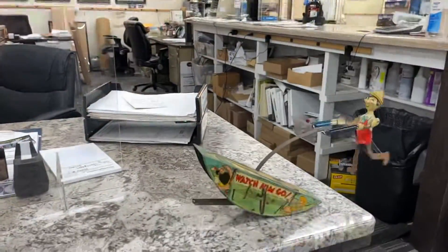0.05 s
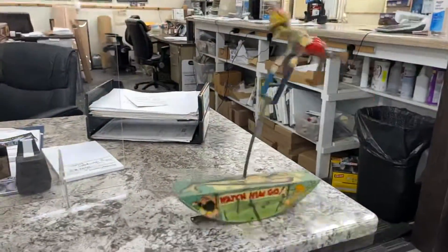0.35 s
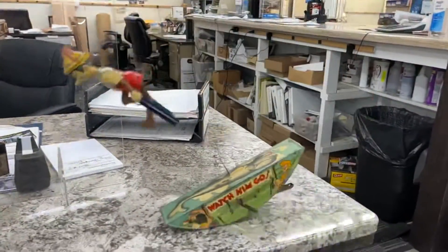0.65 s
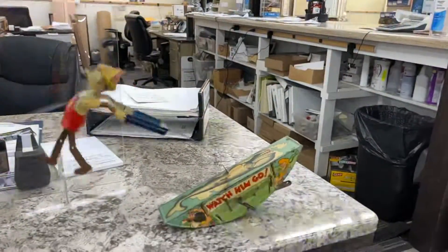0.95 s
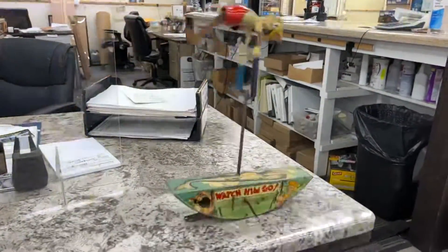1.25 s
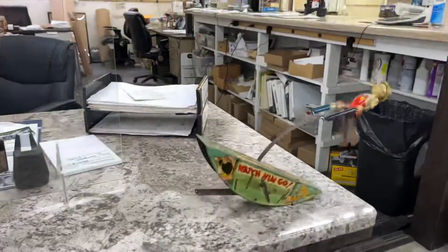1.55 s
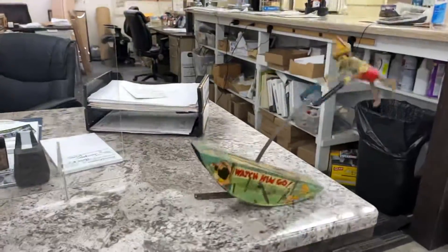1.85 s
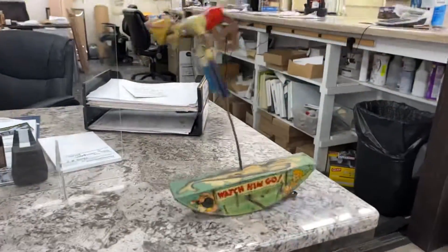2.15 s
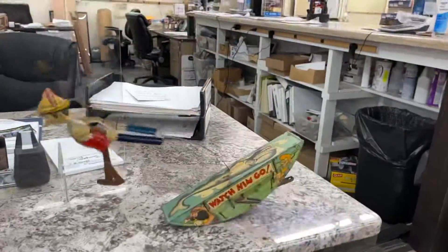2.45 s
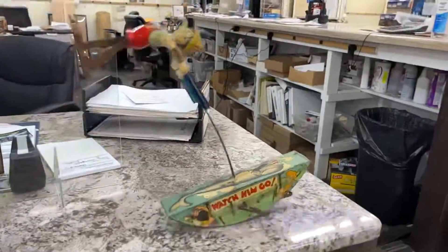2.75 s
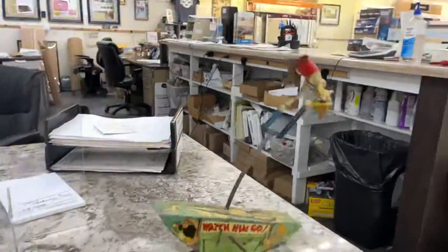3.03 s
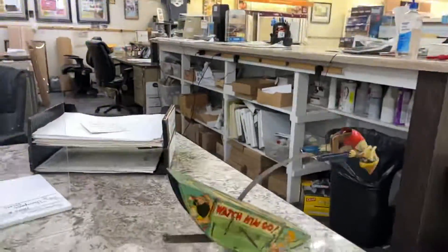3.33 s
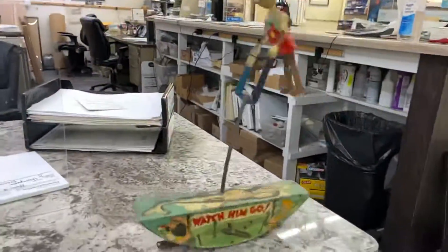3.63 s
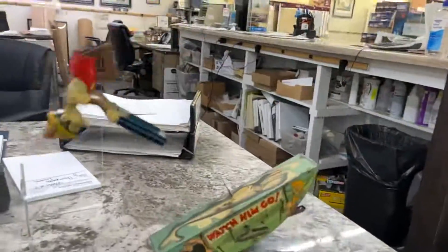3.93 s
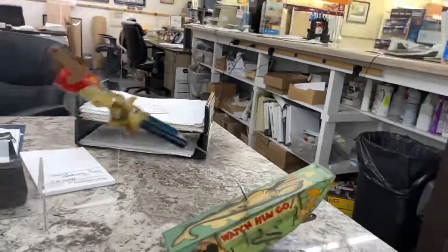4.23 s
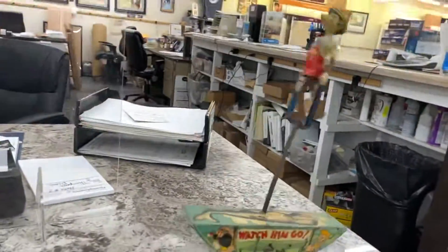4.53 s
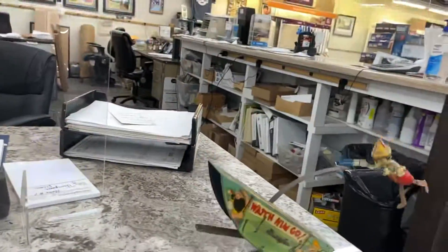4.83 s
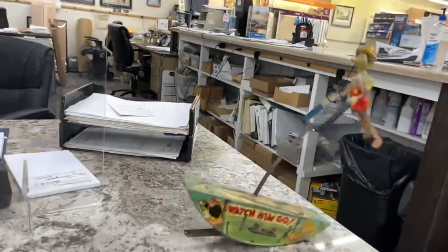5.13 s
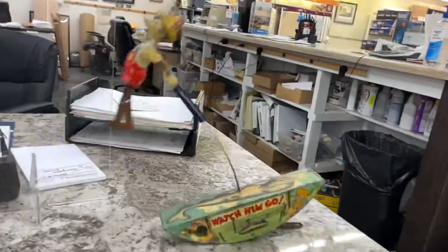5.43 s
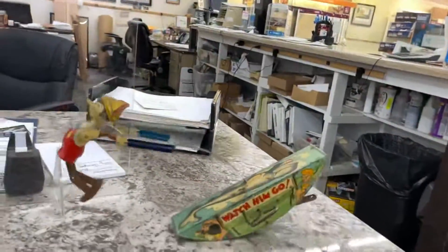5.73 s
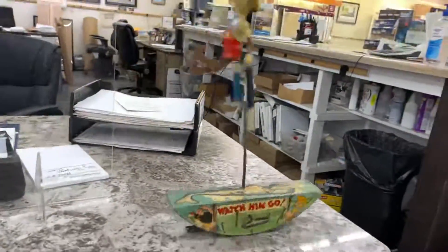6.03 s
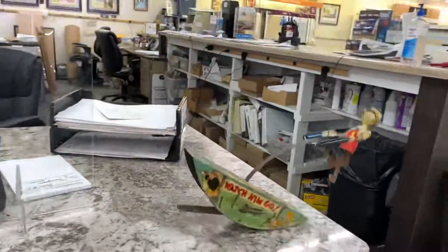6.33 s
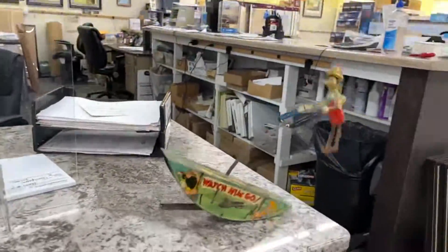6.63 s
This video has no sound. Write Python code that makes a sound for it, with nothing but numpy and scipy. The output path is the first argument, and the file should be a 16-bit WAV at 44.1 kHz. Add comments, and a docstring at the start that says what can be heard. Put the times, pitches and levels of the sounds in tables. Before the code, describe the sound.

A tin wind-up toy rocks back and forth on a stone counter in a quiet office. At the end of each swing its loose parts clatter, a steel rod snaps against its stop and the thin shell rings briefly, eight times at an even pace. Between the clacks come small ticks, a few tiny squeaks and faint gritty rolling. The toy is slightly to the left in stereo, with low ventilation rumble underneath.

```python
"""Tin wind-up toy on a stone counter

A quiet office, a stereo pair, the toy nearer the left microphone and still rattling faintly at the start.
A figure on a rod swings over a boat-shaped hull. At each end of the swing the loose tin parts clatter,
the rod snaps against its stop and rebounds, and the hull rings. In between the hull rolls on the stone
and the joints tick and squeak. Ventilation rumbles underneath."""
import sys
import numpy as np
from scipy import signal
from scipy.fft import rfft, irfft
from scipy.io import wavfile
from scipy.ndimage import uniform_filter1d

SR = 44100
rng = np.random.default_rng(int(sys.argv[2]) if len(sys.argv) > 2 else 0)


def bounce(signal):
    """Save signal as a 16-bit WAV file at the path given by the first command-line argument."""
    frames = np.transpose(np.atleast_2d(signal))
    limited = np.clip(frames, -1, 1)
    pcm = np.round(limited * 32767).astype(np.int16)
    wavfile.write(sys.argv[1], SR, pcm)


N = 298998
BLOW_SAMPLES, LEAD_IN_S = 4096, .008

# the toy lands, left end first, then each end in turn: start_s, level_db, bass_db, relative_ring_db
LANDINGS = [(0.670, -17.7, -3, -25), (1.4755, -15.7, -1.5, -22.5), (2.319, -15.7, 0, -25),
            (3.120, -15.5, 2, -26), (3.9375, -14.8, 0, -26), (4.7355, -15.2, 3, -26.5),
            (5.533, -17.5, 0.5, -25), (6.284, -15.3, 2, -26)]
# the hull sets off rolling: start_s, level_db, brightness_db, lull_db
ROLLS = [(0.29, -46, -8, -14), (1.12, -47.5, -6, -6), (1.94, -45.5, -6, -14), (2.79, -46.5, -6, -7),
         (3.565, -44.5, 1, -8), (4.42, -44, 2, -3), (5.08, -45.5, 0, -7), (5.97, -48, -3, 0),
         (6.65, -43.5, 0, -4)]
# spectrum of a light knock in the toy: frequency_hz, gain_db
TICK_COLOUR = [(200, -12.5), (600, -1), (1000, 9), (1500, 2), (2350, 7.5), (3100, -1.5), (4100, 0),
               (6400, -4.5), (8200, -15.5), (9800, -4.5), (13000, -10), (15500, -21.5)]


def undb(db):
    """Decibels to gain."""
    return 10 ** (np.asarray(db) / 20)


def at(table, hz):
    """Read a curve of frequency_hz, value points on a log-frequency axis."""
    points, values = np.transpose(table)
    return np.interp(np.log(hz + 1), np.log(points), values)


def bins(size):
    """Frequencies in the spectrum of size samples."""
    return np.arange(size // 2 + 1) * SR / size


def unit(x):
    """Scale to rms 1."""
    return x / np.sqrt(np.mean(x ** 2))


def tint(x, db):
    """Minimum-phase filter with a gain in dB for each bin."""
    size = x.shape[-1]
    cepstrum = irfft(np.log(undb(db)), size)
    cepstrum[1:size // 2] *= 2
    cepstrum[size // 2 + 1:] = 0
    return irfft(rfft(x) * np.exp(rfft(cepstrum)), size)


def add(track, start_s, x):
    """Mix x into the track."""
    i = max(int(start_s * SR), 0)
    track[..., i:i + x.shape[-1]] += x[..., :N - i]


def fade(t, t60):
    """Exponential decay by 60 dB in t60 seconds."""
    return np.exp(-np.log(1000) * t / t60)


def wavy(size, span):
    """Smooth random values of rms 1 that change over span points."""
    return unit(uniform_filter1d(uniform_filter1d(rng.standard_normal(size), span), span))


def grit(size, spread_db, width):
    """Dense tiny contacts of uneven strength; width is the part that differs between left and right."""
    strength = undb(spread_db * np.repeat(rng.standard_normal(size // 16 + 1), 16)[:size])
    return unit(strength * (rng.standard_normal(size) + width * rng.standard_normal((2, size))))


def blow(db, length_s, colour_db, rise_s, buzz_db, buzz_t60, width, ripple_db, ragged_db):
    """A run of contacts between metal parts: they graze, bite after LEAD_IN_S and leave a ragged buzz."""
    t = np.arange(BLOW_SAMPLES) / SR - LEAD_IN_S
    after = np.maximum(t, 0)
    bite = .5 + .5 * np.tanh(t / rise_s - .5)
    buzz = undb(buzz_db + ragged_db * wavy(BLOW_SAMPLES, span=150)) * fade(after, buzz_t60)
    force = bite * (np.exp(-(after / length_s) ** 2) + buzz)
    resonances_db = ripple_db * wavy(len(colour_db), span=22)  # each point of contact has its own
    hit = tint(force * grit(BLOW_SAMPLES, spread_db=2.5, width=width), colour_db + resonances_db)
    peak_power = uniform_filter1d(np.mean(hit ** 2, axis=0), size=128).max()
    return undb(db) * hit / np.sqrt(peak_power)


def blows(hits, colour, **contact):
    """Parts knock together, dull or bright. Hits: start_s, level_db, bass_db, treble_db, length_s."""
    out, hz = np.zeros((2, N)), bins(BLOW_SAMPLES)
    for start_s, db, bass_db, treble_db, length_s in hits:
        shade_db = at([(1200, bass_db), (4000, 0), (9000, treble_db)], hz)
        add(out, start_s - LEAD_IN_S, blow(db, length_s, at(colour, hz) + shade_db, **contact))
    return out


def ventilation(drone_hz=73, drone_width_hz=12, drone_db=4, air_db=-43):
    """Low duct rumble, nearly alike at both microphones, with faint steady air noise above."""
    # spectrum of the duct noise: frequency_hz, gain_db
    duct_colour = [(15, -24), (45, -8), (75, 2.5), (110, -6.5), (170, -18), (300, -27.5), (600, -33),
                   (1100, -32), (3000, -43), (6000, -54), (9000, -60.5), (15000, -72)]
    # the rumble swells and ebbs: time_s, level_db
    swells = [(0.0, -41.5), (2.08, -46.5), (2.26, -43.5), (5.93, -42.5), (6.78, -38.5)]
    hz = bins(N)
    colour_db = at(duct_colour, hz) + drone_db * np.exp(-((hz - drone_hz) / drone_width_hz) ** 2)
    mid, side = tint(rng.standard_normal((2, N)), colour_db)
    side = tint(side, at([(70, -16), (250, -10), (700, -2.5)], hz))
    air = unit(np.array([mid + side, mid - side]))
    rumble = irfft(rfft(air) * (hz < 160), N)
    swell_db = np.interp(np.arange(N) / SR, *np.transpose(swells))
    return rumble * undb(swell_db) + (air - rumble) * undb(air_db)


def office(x, early_db=-11, early_t60=.27, late_db=-11):
    """Quick reflections from the counter and shelves, then a diffuse tail."""
    # decay of the tail: frequency_hz, t60_s
    decay = [(250, 0.22), (900, 0.45), (2200, 0.48), (5000, 0.73), (9000, 0.55), (14000, 0.49)]
    # spectrum of the reflected sound: frequency_hz, gain_db
    room_colour = [(200, -2.5), (450, 0), (900, -1.5), (2000, 3), (4500, 0), (7000, -0.5), (9000, -7),
                   (12500, -1.5), (15000, -30)]
    t, hz = np.arange(SR) / SR, bins(SR)
    noise = rfft(rng.standard_normal((2, SR)))
    band = np.round(2 * np.log2(np.maximum(hz, 200))) / 2  # half octaves
    late = sum(irfft(noise * (band == k), SR) * fade(t, at(decay, 2 ** k)) for k in np.unique(band))
    late = unit(late * (1 - np.exp(-t / .0088)))
    early = unit(rng.standard_normal((2, SR)) * fade(t, early_t60) * (t > .002))
    response = tint(undb(early_db) * early + undb(late_db) * late, at(room_colour, hz)) / np.sqrt(SR)
    return signal.fftconvolve(x, response, axes=1)[:, :N]


def direct_sound(x):
    """The toy stands nearer the left microphone: on the whole louder and earlier there."""
    # balance of the pair: frequency_hz, left_minus_right_db
    balance = [(150, -0.5), (380, -1), (700, 3.5), (1290, 9), (2380, 2), (4400, 2), (9000, .3)]
    # phase between the microphones: frequency_hz, left_lead_rad
    lead = [(100, 0), (1290, 1.1), (1810, 5.7), (2580, 6.6), (3700, 13.2), (5940, 14.3), (8790, 14.4),
            (13500, 14)]
    hz = bins(N)
    half_db = at(balance, hz) / 2
    left, right = undb(half_db), undb(-half_db) * np.exp(-1j * at(lead, hz))
    return irfft(rfft(x) * np.array([left, right]), N)


def roll_length(start_s, longest_s=.45):
    """Seconds from setting off to the next landing, at most longest_s."""
    return min([longest_s] + [land_s - start_s for land_s, *_ in LANDINGS if land_s > start_s])


def rolling(bumps_db=2.5, ripple_db=3, sag_db=-2, attack_s=.035, release_s=.02):
    """The curved tin bottom crunches over the grain of the stone, with a lull before it tips."""
    # spectrum of tin rolling on stone: frequency_hz, gain_db
    roll_colour = [(150, -17.5), (330, -13), (530, 2), (700, -5), (920, 2), (1400, -14), (2400, -16),
                   (4500, -27), (8000, -45)]
    out, size = np.zeros((2, N)), SR // 2
    t, hz = np.arange(size) / SR, bins(size)
    for start_s, db, bright_db, lull_db in ROLLS:
        length_s = roll_length(start_s)
        colour_db = at(roll_colour, hz) + at([(600, 0), (950, bright_db)], hz)
        colour_db += ripple_db * wavy(len(hz), span=40)
        bumps = undb(bumps_db * wavy(size, span=200))
        crunch = tint(bumps * grit(size, spread_db=4, width=.2), colour_db)
        gate = np.clip(t / attack_s, 0, 1) * np.clip(1 + (length_s - t) / release_s, 0, 1)
        progress = t / length_s
        lull = np.exp(-((progress - .65) / .17) ** 2)
        add(out, start_s, undb(db + sag_db * progress + lull_db * lull) * gate * unit(crunch))
    return out


def chatter(per_roll=8, relative_db=-4, scatter_db=3.5):
    """While the hull rolls, its loose parts jiggle faintly at random moments."""
    out, hz = np.zeros((2, N)), bins(BLOW_SAMPLES)
    colour_db = at(TICK_COLOUR, hz) + at([(1200, -2), (2500, 0), (9000, -12)], hz)
    for start_s, roll_db, *_ in ROLLS:
        moments_s = start_s + roll_length(start_s) * (np.arange(per_roll) + rng.random(per_roll)) / per_roll
        levels_db = roll_db + relative_db + scatter_db * rng.standard_normal(per_roll)
        for when_s, db in zip(moments_s, levels_db):
            jiggle = blow(db, length_s=.005, colour_db=colour_db, rise_s=.002, buzz_db=-9, buzz_t60=.09,
                          width=.5, ripple_db=5, ragged_db=3)
            add(out, min(when_s, (N - 1) / SR), jiggle)
    return out


def squeaks(waver=.018, rough_db=4):
    """A dry pivot sticks and slips for a moment: a thin, unsteady tone."""
    # slips of the pivots: start_s, level_db, pitch_hz, length_s, overtone_db, glide_ratio
    slips = [(2.2, -23.5, 2334, 0.0098, -25, 0.03), (2.518, -37.5, 1130, 0.06, -20, -0.025),
             (2.65, -43.5, 1020, 0.05, -30, 0.02), (4.343, -39, 2150, 0.022, -4, -0.02),
             (4.717, -17.5, 2290, 0.0029, -23, -0.0085), (6.51, -58, 6400, .3, -41, .08)]
    out = np.zeros(N)
    for start_s, db, pitch_hz, length_s, overtone_db, glide in slips:
        progress = np.arange(int(2 * length_s * SR)) / (length_s * SR)  # runs to 2 to let the tail die
        bend = 1 + glide * (progress - .5) + waver * wavy(len(progress), span=60)
        phase = 2 * np.pi * np.cumsum(pitch_hz * bend) / SR
        tone = np.sin(phase) + undb(overtone_db) * (np.sin(2 * phase) + .5 * np.sin(3 * phase))
        swell = progress * np.exp(-2 * progress ** 2) * undb(rough_db * wavy(len(progress), span=150))
        add(out, start_s, undb(db) * tone * swell / swell.max())
    return out


def small_knocks():
    """An opening rattle, then joint ticks and a few further bumps of the hull; on each swing left the hull
    bumps and the figure flops."""
    # the toy still rings and rattles faintly at the start, then its joints tick; the bass-heavy rows are the
    # hull bumping on the stone: # start_s, level_db, bass_db, treble_db
    rattle_and_ticks = [(0.008, -33, -18, -4), (0.03, -38, -14, -2), (0.07, -39, -14, 6),
                        (0.118, -32, -17, 7), (0.932, -41, -5, -7), (1.237, -41, -3, 4),
                        (1.326, -35.5, 4, -2), (1.375, -36.5, -14, 1), (1.445, -39, 8, -2),
                        (2.074, -41, 3, 6), (2.198, -31.5, -8, 15), (2.766, -45, -10, 11),
                        (2.86, -40, 3, 5), (2.895, -39, 2, 6), (2.982, -40, 2, -6), (3.005, -36.5, -7, -8),
                        (3.067, -34, -15, 7), (3.485, -43.5, 14, -8), (4.419, -33, -12, -4),
                        (4.578, -30, -12, 8), (4.588, -19.5, -7, 6), (4.597, -26, -6, 5),
                        (4.624, -30.5, -10, 0), (4.667, -35, 0, 4), (4.713, -31.5, -1, 10),
                        (5.004, -38, -3, 8), (5.18, -38, 10, -10), (5.199, -34, 5, 8),
                        (5.755, -29.5, -14, -8), (5.956, -34.5, -13, 1), (6.14, -39, 3, 2),
                        (6.179, -22.5, -7, 4), (6.19, -27, -4, 2), (6.216, -31, -4, -2),
                        (6.729, -36, 13, -16)]
    # the hull sets off: delay_s, level_db, bass_db, treble_db, length_s
    bump = (.018, -37.5, 17, -9, .006)
    # the figure falls over: before_landing_s, bass_db, treble_db, length_s
    flop = (.171, -5, -6, .009)
    # strength of each flop: level_db
    flop_levels = [-41, -33, -32, -35.5]
    tap_length_s = .0065
    taps = [(*tap, tap_length_s) for tap in rattle_and_ticks]
    bumps = [(roll[0] + bump[0], *bump[1:]) for roll in ROLLS[::2]]
    flops = [(landing[0] - flop[0], db, *flop[1:]) for landing, db in zip(LANDINGS[::2], flop_levels)]
    return taps + bumps + flops


def light_knocking(knocks):
    """Light knocks inside the toy, each with a short, ragged buzz."""
    return blows(knocks, TICK_COLOUR, rise_s=.002, buzz_db=-8, buzz_t60=.14,
                 width=.6, ripple_db=4, ragged_db=3.5)


def singing_rod(start_s=1.495, level_db=-37, pitch_hz=4580, t60=.62):
    """One hard stop sets the steel rod singing: a clear partial that outlasts the clatter."""
    out, t = np.zeros(N), np.arange(SR) / SR
    add(out, start_s, undb(level_db) * fade(t, t60) * np.sin(2 * np.pi * pitch_hz * t))
    return out


def hull_ring(strikes, scatter_db=4, detune=.004):
    """The thin shell rings on, each time with another mix of modes, a little detuned as it flexes."""
    # modes of the tin hull: pitch_hz, level_db, t60_s
    hull_modes = [(804.5, -4.5, 0.3), (880, -1.5, 0.3), (1020, -4, 0.32), (1138, -3, 0.3), (1600, -3, 0.3),
                  (1990, -2.5, 0.33), (2375, -5, .22), (3920, -0.5, 0.2), (4080, -0.5, 0.36),
                  (4386, 0, 0.26), (4447, -2, .35), (4580, -1, 0.44), (4920, -4.5, 0.24), (5140, -9.5, .2),
                  (5980, -9.5, 0.25), (6330, -7.5, 0.34), (6440, 0, 0.31), (7316, -13, 0.13),
                  (8700, -11, 0.21), (8886, -2.5, 0.36), (9300, -9, 0.17), (11600, -9.5, 0.14)]
    out, t = np.zeros((2, N)), np.arange(SR // 2) / SR
    modes = np.array([undb(db) * fade(t, t60) * np.exp(2j * np.pi * hz * t) for hz, db, t60 in hull_modes])
    for start_s, db, *_ in strikes:
        gains = undb(scatter_db * rng.standard_normal(len(modes)))
        phases = np.exp(2j * np.pi * rng.random((2, len(modes))))
        flexed_t = t * (1 + detune * rng.standard_normal())
        ring = np.array([np.interp(flexed_t, t, side) for side in ((gains * phases) @ modes).imag])
        add(out, start_s, undb(db) * ring * (1 - np.exp(-t / .002)))
    return out


def rod_snaps(snaps):
    """Steel meets tin at the stop: a very short, bright crack."""
    # spectrum of the crack: frequency_hz, gain_db
    snap_colour = [(200, -28), (950, -8), (2800, -22), (4400, -4.5), (5300, -18.5), (7300, -5),
                   (8200, -15.5), (8900, 8), (10000, -10), (11600, -10), (12800, -17.5), (15500, -31)]
    out, colour_db = np.zeros((2, N)), at(snap_colour, bins(BLOW_SAMPLES))
    for start_s, db, length_s in snaps:
        crack = blow(db, length_s, colour_db, rise_s=.0004, buzz_db=-14, buzz_t60=.04,
                     width=.2, ripple_db=1.5, ragged_db=2)
        add(out, start_s - LEAD_IN_S, crack)
    return out


def tin_clatter(clatters):
    """The loose tin parts crash together as the toy lands."""
    # spectrum of tin on tin: frequency_hz, gain_db
    tin_colour = [(150, -16), (450, -9), (700, -7.5), (950, 5.2), (1550, -1.5), (2300, -6.5), (3100, -8),
                  (4000, -6), (5900, -3.5), (7500, -12), (11000, -7.5), (13500, -11), (15500, -20)]
    return blows(clatters, tin_colour, rise_s=.0023, buzz_db=-8, buzz_t60=.08,
                 width=.57, ripple_db=2.5, ragged_db=1.5)


def landing_hits(rebound_s=.0215, snap_ring_db=-4):
    """Each landing sets off clatters and two snaps of the rod; all but the rebound ring the hull."""
    # the parts strike, tumble and settle: delay_s, relative_db, bass_db, treble_db, length_s
    left_clatter = [(0, 0, -1, 1.5, .006), (.006, -4, 5, 2, .009), (.040, -2.8, -1.5, -5, .020)]
    right_clatter = [(0, 1.0, 0, 1.5, .007), (.007, -2, 2, -1, .011), (.031, -8, -3, -9, .007)]
    # the rod hits its stop and rebounds: delay_s, relative_db, length_s, rebound_db, rebound_length_s
    left_stop = (.0338, 5, .0024, -10, .006)
    right_stop = (.0194, 2.6, .001, -5, .005)
    clatters, snaps, rings = [], [], []
    for k, (start_s, db, bass_db, ring_db) in enumerate(LANDINGS):
        parts, stop = (right_clatter, right_stop) if k % 2 else (left_clatter, left_stop)
        for delay_s, part_db, part_bass_db, treble_db, length_s in parts:
            clatters.append((start_s + delay_s, db + part_db, bass_db + part_bass_db, treble_db, length_s))
            rings.append((start_s + delay_s, db + part_db + ring_db))
        delay_s, stop_db, length_s, rebound_db, rebound_length_s = stop
        snaps.append((start_s + delay_s, db + stop_db, length_s))
        snaps.append((start_s + delay_s + rebound_s, db + stop_db + rebound_db, rebound_length_s))
        rings.append((start_s + delay_s, db + stop_db + ring_db + snap_ring_db))
    return clatters, snaps, rings


def scene(knock_ring_db=-31):
    """The toy reaches the microphones directly and by way of the office, over the ventilation."""
    clatters, snaps, rings = landing_hits()
    knocks = small_knocks()
    toy = tin_clatter(clatters) + light_knocking(knocks)
    toy += hull_ring(rings) + undb(knock_ring_db) * hull_ring(knocks)
    toy += rod_snaps(snaps) + singing_rod() + squeaks() + rolling() + chatter()
    return direct_sound(toy) + office(toy) + ventilation()


def record(dry, ceiling=1.3, top_hz=15400):
    """The phone rounds the highest peaks and cuts the top."""
    rounded = ceiling * np.tanh(dry / ceiling)
    return signal.sosfilt(signal.ellip(8, .2, 70, top_hz, fs=SR, output="sos"), rounded)


dry = scene()
out = record(dry)
bounce(out)
```